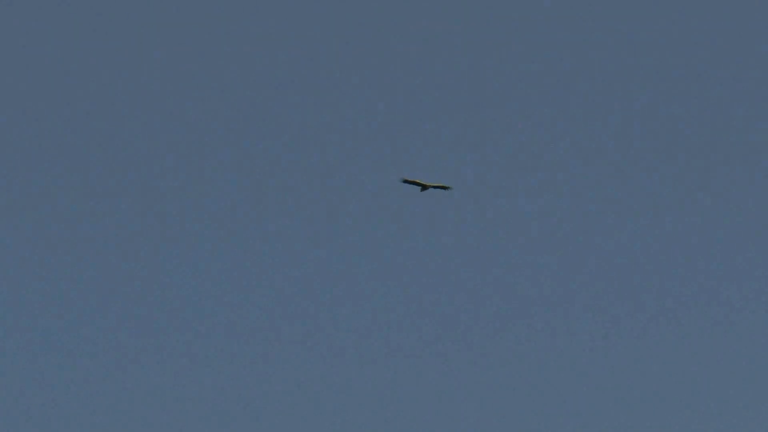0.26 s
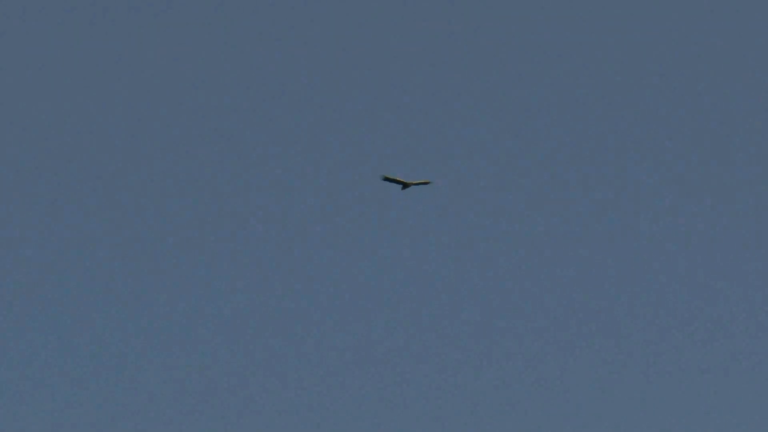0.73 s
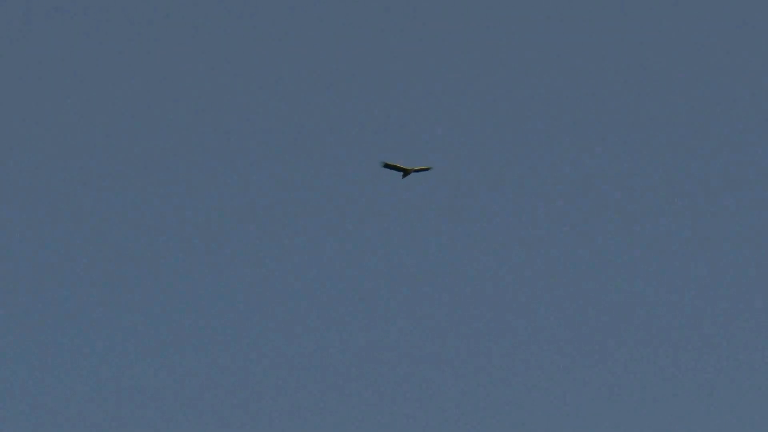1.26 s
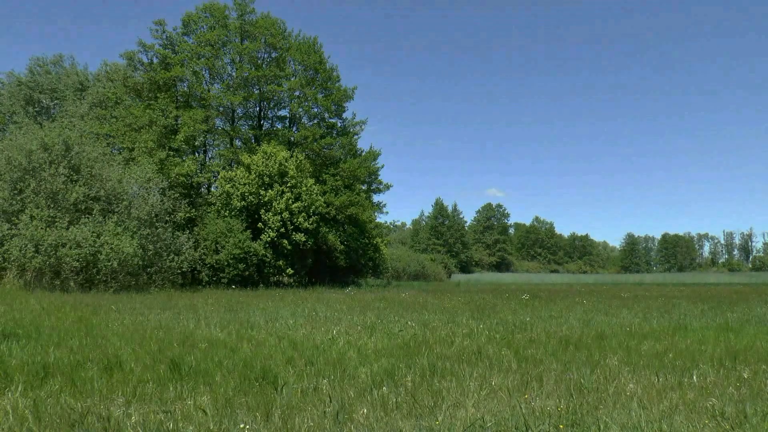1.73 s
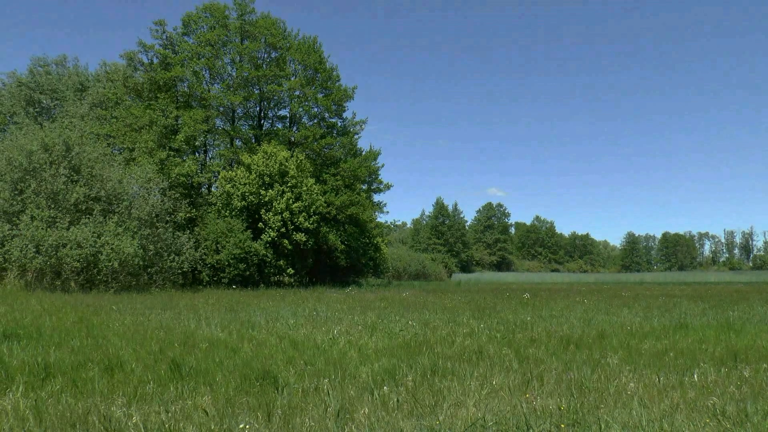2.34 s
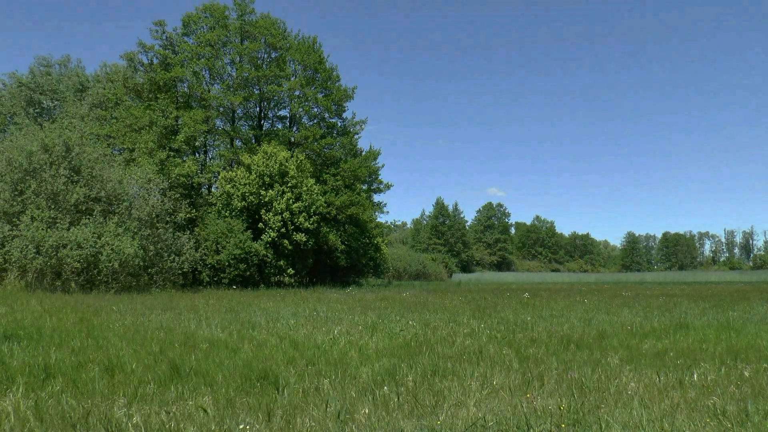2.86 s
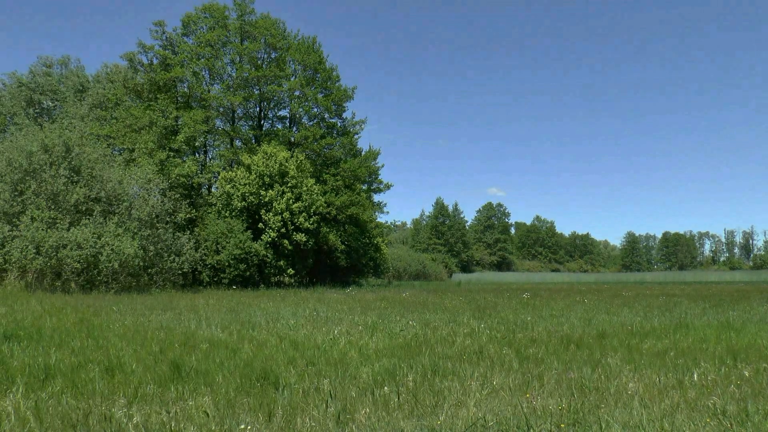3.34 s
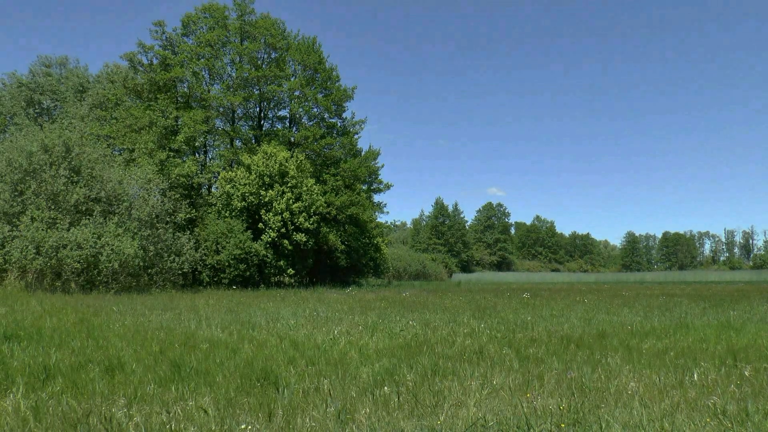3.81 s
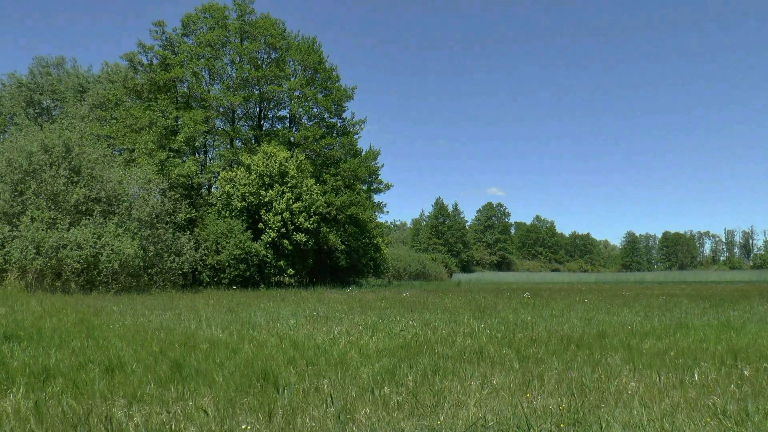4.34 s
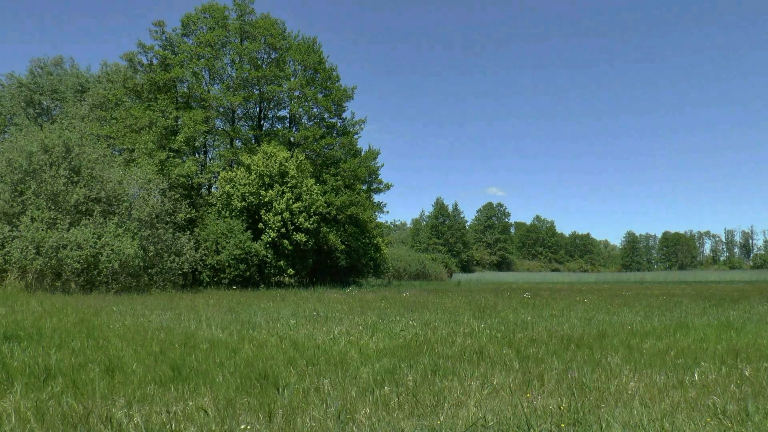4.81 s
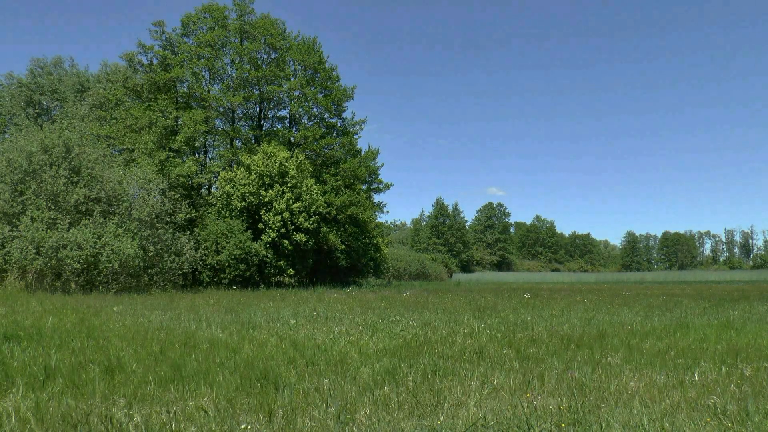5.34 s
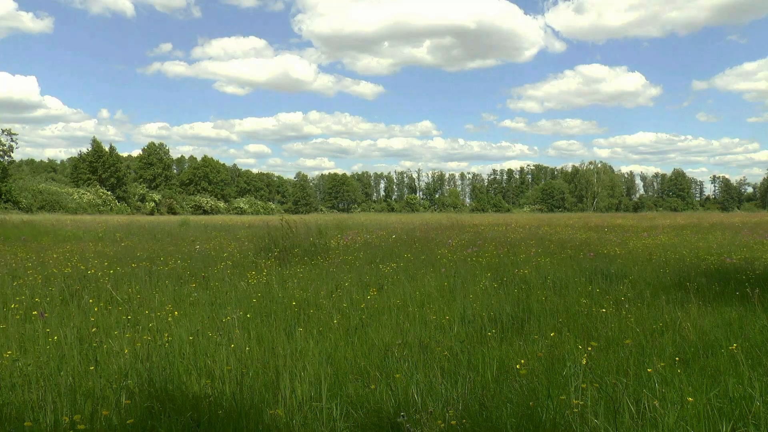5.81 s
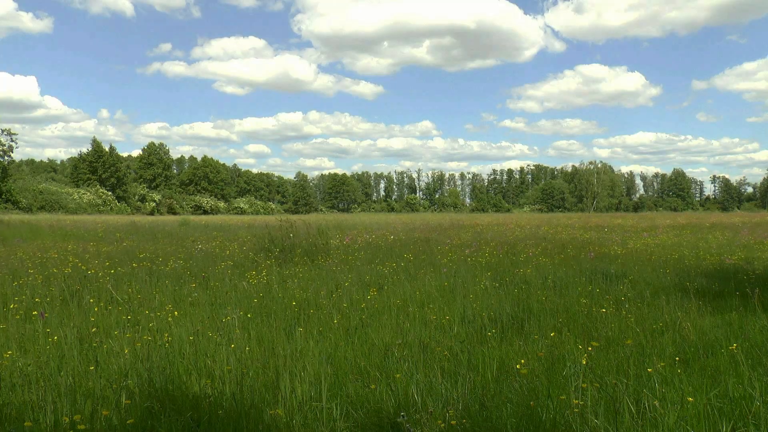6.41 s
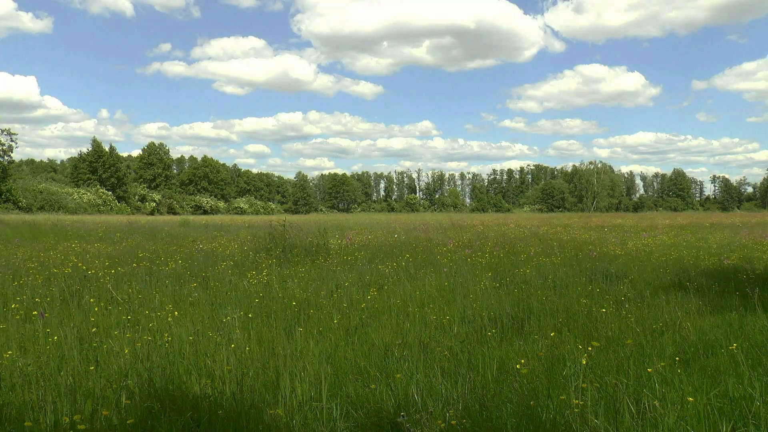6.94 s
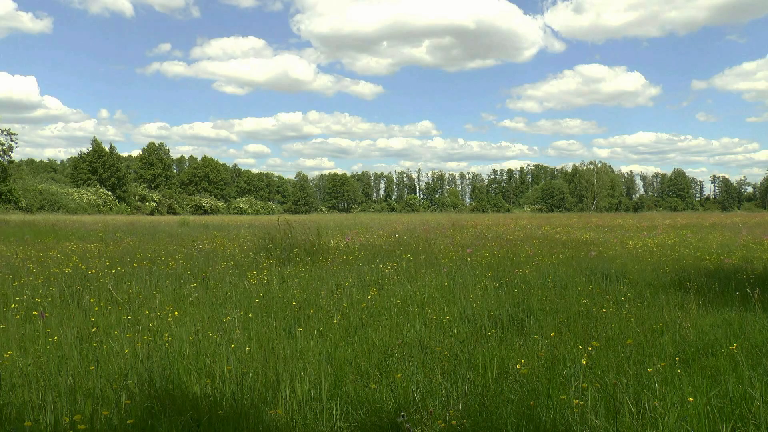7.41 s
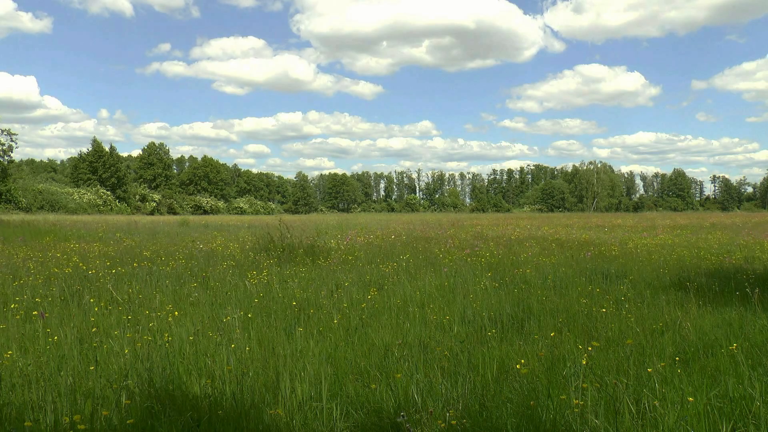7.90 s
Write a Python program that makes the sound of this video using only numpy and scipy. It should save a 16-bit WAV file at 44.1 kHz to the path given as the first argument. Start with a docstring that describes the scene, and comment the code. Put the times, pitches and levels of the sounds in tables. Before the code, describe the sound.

Open meadow near trees, heard outdoors with a short leafy tail. From 0 to 1 s a strong nightingale-like bird gives six tiny falling whistles, evenly spaced, over very quiet air; a faint warbler churr underlies the first. Between 1.1 and 2 s dry ticks and faster, stronger churrs follow, while low hum, rumble and fine grass hiss swell and spread wide. A corncrake begins weakly at 1.8 s, then rasps firmly from 2.2 s, roughly every half second to the end, each a gritty buzz under 0.2 s. Thin far whistles sound at 2.1-2.9 s. The singer gives upward hooks at 3.3 and 3.7 s; warbler ticks come at 4.1 s, a soft low purr at 4.3 s, then a growing ten-flick rattle from 4.6 to 5.25 s. A sharp warbler tick-slur lands at 5.3 s, a faint soft knock at 5.6 s. A distant arched whistle comes at 7 s, faint rising slurs at 7.4 and 7.8 s, and two dipping scoops from 8 s.

```python
"""A summer meadow edged by trees. From the start a warbler churrs faintly in runs of noise clicks, later also
ticking and slurring, while a nightingale-like singer gives falling whistles as gliding sines.
The air (coloured noise: hum, rumble, breeze, grass hiss) mostly swells and widens from 1.3 s to 2 s.
From about two seconds a corncrake rasps, pulses ringing its throat, and small birds whistle further off.
The singer goes on to hooks, a fast rattle and last scoops; the trees return a short tail."""
import sys
import numpy as np
from scipy import signal
from scipy.fft import rfft, irfft, next_fast_len
from scipy.io import wavfile
from scipy.ndimage import uniform_filter1d

SR = 44100
rng = np.random.default_rng(int(sys.argv[2]) if len(sys.argv) > 2 else 0)


def store_pcm(level_fs):
    """Save levels as 16-bit WAV."""
    pcm = np.round(np.clip(level_fs, -1, 1) * 32767).astype(np.int16)
    wavfile.write(sys.argv[1], SR, np.atleast_2d(pcm).T)


N = 359856
TIME = np.arange(N) / SR

# growth of the air: (time [s], share of the change [0-1])
AIR_RISE = [(1.3, 0.061), (1.7, 0.47), (2.05, 0.96)]
# spectra of the air layers: (frequency [Hz], relative level [dB])
HUM = [(20, -31), (45, -17.5), (70, -6.5), (120, 1), (160, -6.5), (205, -23.5), (270, -31.5), (500, -73.5)]
RUMBLE = [(15, -7.5), (30, -1), (50, 0), (80, -6.5), (130, -32), (250, -69)]
BREEZE = [(100, -10), (300, -4.5), (550, -7.5), (1100, -10.5), (1700, -13), (3000, -11.5), (6000, -23.5),
          (10000, -43.5)]
GRASS = [(1800, -37.5), (2450, -5.5), (2750, -23), (3400, -19.5), (3900, -24.5), (5050, -25.5),
         (5550, -3.5), (5950, -21), (6550, -6.5), (6900, -9), (7950, 7), (8450, -7.5), (9600, -18),
         (11000, -56), (13500, -47.5), (14500, -29.5), (15700, -9.5), (16500, -37.5)]
# levels at share 0 and share 1 of AIR_RISE; width is side over mid before each layer's offset
HUM_DB, RUMBLE_DB, GRASS_DB, WIDTH_DB = (-51, -44.5), (-71.5, -36.5), (-85.5, -46.5), (-33, 0.5)
# soft knock: (time [s], level [dB])
KNOCKS = [(5.606, -47.5)]
# knock spectrum: (frequency [Hz], relative level [dB])
KNOCK_COLOUR = [(100, -10), (280, 9), (500, -14), (1000, -25), (1700, 3), (3000, -38)]

# warbler churrs: (first click [s], last click [s], mean rate [clicks/s], slowing [0-1],
#                  first level [dB], later level [dB], treble lift [dB])
CHURRS = [(.004, .34, 67, 0, -36.5, -53, 4), (1.277, 1.424, 69, 0.13, -49, -48.5, 8),
          (1.434, 1.648, 60, .065, -31.5, -21.5, -14.5), (1.843, 2.038, 61, 0.27, -22.5, -17.5, 5)]
# churr and tick resonances: (frequency [Hz], relative level [dB])
CHURR_COLOUR = [(2500, -44), (3550, -23), (4000, 4.5), (4500, 10), (4900, 4.5), (5300, -12.5), (5600, -0.5),
                (6300, 2.5), (6750, -11), (7400, -8.5), (8450, -36), (9200, -21), (11000, -57.5),
                (13500, -53), (15000, -29), (16500, -44)]
TICK_COLOUR = [(2500, -32.5), (3500, -23.5), (4100, 8), (5000, 5.5), (6200, 6.5), (7400, -3), (8300, -13),
               (9300, -18), (11000, -64.5), (13500, -51), (15000, -20), (16500, -39.5)]
# warbler ticks: (time [s], level [dB], clicks [count])
TICKS = [(1.136, -44, 2), (1.201, -45, 2), (1.708, -26, 2), (1.778, -24, 2), (4.116, -24, 1),
         (4.157, -27.5, 1), (4.232, -18.5, 1), (5.334, -16.5, 2)]
# warbler slurs: (start [s], length [s], start pitch [Hz], end pitch [Hz], level [dB])
SLURS = [(5.341, .022, 5550, 4190, -15.5), (7.428, 0.073, 7050, 8030, -32), (7.772, 0.065, 7040, 7630, -32)]
CHURR_RISE = .07  # share by which the resonances climb through a churr
TICK_GAP_S = 0.0065

# singer's note shapes: (share of length [0-1], pitch [Hz], relative level [dB])
FALL_SHAPE = [(0, 3900, -25), (.1, 3534, -4.5), (.3, 2986, -3), (.5, 2602, -1), (.74, 2253, -3.5),
              (.88, 1974, -9.5), (1, 1806, -25)]
HOOK_SHAPE = [(0, 2075, -32), (.2, 1836, -17.5), (.4, 1771, -13), (.62, 1888, -11), (.74, 2168, -9),
              (.81, 2300, 0.5), (.9, 2321, -1.5), (1, 2261, -16)]
SCOOP_SHAPE = [(0, 3830, -26), (.22, 2697, -11.5), (.38, 2257, -4), (.55, 2276, -1), (.72, 2480, 0.5),
               (.88, 2754, -5), (1, 3050, -27)]
# falling whistles: (start [s], length [s], level [dB])
FALLS = [(0.022, 0.039, -12), (0.216, 0.039, -7.5), (0.398, 0.04, -7.5), (.591, 0.036, -6.5),
         (.776, 0.037, -6.5), (.961, 0.034, -7)]
# rising hooks: (start [s], length [s], pitch [ratio], level [dB])
HOOKS = [(3.28, .078, 0.99, -11.5), (3.709, .078, 0.99, -8)]
# rattle of downward flicks: (start [s], level [dB])
RATTLE = [(4.587, -19.5), (4.66, -18), (4.734, -13.5), (4.808, -13.5), (4.878, -11), (4.946, -11.5),
          (5.015, -10.5), (5.084, -10.5), (5.161, -11), (5.234, -11.5)]
# scoops that dip and rise: (start [s], length [s], level [dB])
SCOOPS = [(7.973, .04, -17.5), (8.089, .04, -17)]
FLICK_S, FLICK_HZ = .015, (3060, 2470, 1540)  # start, middle, end of the strongest flick
FLICK_SAG = 0.1  # share by which the weakest flick is lower
SNAP_LAG_S, SNAP_S, SNAP_HZ, SNAP_DB = 0.038, 0.019, (3560, 2656, 1750), 2  # ends each scoop; dB re scoop
# soft notes between phrases: (start [s], length [s], start pitch [Hz], end pitch [Hz], level [dB])
PIPS = [(3.377, 0.035, 1365, 1210, -34), (3.599, 0.019, 3130, 1270, -37.5),
        (3.806, .055, 1437, 1334, -34.5), (4.193, 0.096, 2410, 2140, -36.5)]
# very faint low blip about 0.1 s after each fall; dB re fall
BLIP_LAG_S, BLIP_S, BLIP_HZ, BLIP_DB = 0.1, .013, (1490, 1030), -45
# five low notes shortly before the rattle; levels of the first and last
PURR_START_S, PURR_GAP_S, PURR_NOTE_S, PURR_HZ, PURR_DB = 4.313, .027, 0.019, (1237, 1240), (-30, -30.5)

# corncrake rasps: (start [s], end [s], level [dB])
RASPS = [(1.791, 1.897, -35.5), (2.21, 2.388, -20), (2.839, 2.997, -22.5), (3.299, 3.492, -21.5),
         (3.863, 4.034, -21), (4.348, 4.53, -21.5), (4.936, 5.111, -22.5), (5.423, 5.592, -20.5),
         (6.129, 6.278, -22), (6.598, 6.779, -20.5), (7.146, 7.311, -20.5), (7.652, 7.815, -20.5)]
# effort through a rasp: (share of length [0-1], relative level [dB])
RASP_EFFORT = [(0, -18), (.07, -6.5), (.17, -4.5), (.4, -2.35), (.85, -2.1), (1, -8.5)]
# throat resonances, open beak: (frequency [Hz], relative level [dB])
THROAT = [(700, -51), (1200, -29), (1680, -33), (1950, -4.5), (2200, 2), (2530, 6), (2740, -21),
          (2880, -6.5), (3020, -16.5), (3220, 4.5), (3480, -0.5), (3660, -19.5), (4200, 4), (4680, -8.5),
          (5550, 6), (6200, 1.5), (6550, -10), (7300, -45), (10000, -84.5)]
# colour added by the shut beak: (frequency [Hz], change [dB])
SHUT_BEAK = [(2600, -1), (3200, -8.5), (3600, -12), (4200, 4.5), (5600, 0), (6400, 0.5)]
RASP_RATE_HZ, RASP_LIMP = 121, .16  # mean pulse rate; share by which gaps alternate long and short
BEAK_OPEN_SHARE = 0.46  # share of a rasp that the beak takes to open

# far whistles, before a small trim: (time [s], pitch [Hz], level [dB])
HIGH_WHISTLE = [(2.144, 5900, -43), (2.155, 7300, -24.5), (2.17, 7940, -29.5), (2.2, 7050, -23),
                (2.211, 6650, -35)]
LEVEL_WHISTLE = [(2.56, 3080, -41), (2.576, 3040, -27), (2.622, 2964, -27), (2.648, 2970, -37.5),
                 (2.846, 2945, -25.5), (2.868, 2957, -19), (2.926, 3013, -30.5), (2.93, 3000, -31)]
ARCHED_WHISTLE = [(6.86, 4440, -36), (6.878, 4585, -25), (7.02, 5050, -45), (7.042, 5080, -26.5),
                  (7.094, 4875, -21.5), (7.128, 4420, -25), (7.136, 4140, -26.5), (7.145, 4272, -35)]
# far peeps: (start [s], length [s], start pitch [Hz], end pitch [Hz], level [dB])
PEEPS = [(2.362, 0.067, 4940, 4800, -26.5), (2.607, .1, 4500, 4400, -40.5),
         (4.627, .045, 4470, 4350, -44.5)]

TOP_HZ = 15900


def undb(db):
    """Decibels to gain."""
    return 10 ** (np.asarray(db) / 20)


def unit(x):
    """Scale to rms 1."""
    return x / np.sqrt(np.mean(x ** 2) + 1e-20)


def add(track, s, sound):
    """Mix a sound into a track at a time in seconds."""
    i = max(int(s * SR), 0)
    track[i:i + len(sound)] += sound[:max(N - i, 0)]


def gains(points, size):
    """Gain per transform bin from (Hz, dB) points, interpolated over log frequency."""
    hz, db = np.transpose(points)
    bin_hz = np.arange(size // 2 + 1) * SR / size
    return undb(np.interp(np.log(bin_hz + 1), np.log(hz), db))


def resonate(x, points, size=1024):
    """Ring a sound through a minimum-phase filter of unit energy."""
    # folding the cepstrum makes the response causal
    cepstrum = irfft(np.log(gains(points, size)))
    cepstrum[1:size // 2] *= 2
    cepstrum[size // 2 + 1:] = 0
    ring = irfft(np.exp(rfft(cepstrum)))
    return signal.oaconvolve(x, ring / np.linalg.norm(ring))[:N]


def walk(rate_hz):
    """Random drift of rms near 1: held noise smoothed twice."""
    k = int(SR / rate_hz)
    steps = np.repeat(rng.standard_normal(N // k + 1), k)
    smooth = uniform_filter1d(uniform_filter1d(steps, k), k)
    return unit(smooth[:N])


def wash(points, side_db):
    """Coloured stereo noise of rms near 1; side_db is side over mid."""
    size = next_fast_len(N)
    spectrum = rfft(rng.standard_normal((2, size))) * gains(points, size)
    mid, side = unit(irfft(spectrum, size)[:, :N])
    side_gain = undb(side_db)
    return (mid + side_gain * side * np.array([[1], [-1]])) / np.hypot(1, side_gain)


def background():
    """Distant hum, low wind rumble, soft breeze, shimmering grass hiss and one soft knock, as coloured noise."""
    rise = np.interp(TIME, *np.transpose(AIR_RISE))
    hum_db, rumble_db, grass_db, width_db = (
        before + rise * (after - before) for before, after in (HUM_DB, RUMBLE_DB, GRASS_DB, WIDTH_DB))
    hum = wash(HUM, side_db=width_db - 4.5) * undb(hum_db)
    rumble = wash(RUMBLE, side_db=width_db + 5.0) * undb(rumble_db)
    grass = wash(GRASS, side_db=width_db) * undb(grass_db + 2.7 * walk(14))
    breeze = wash(BREEZE, side_db=width_db - 8.5) * undb(-61.0)
    knock = snaps(KNOCKS, KNOCK_COLOUR, length_s=0.02)
    return hum + rumble + grass + breeze + knock


def churrs(click_s):
    """Runs of noise clicks that keep pace or slow; resonances climb while the level swells or fades."""
    out, window = np.zeros(N), np.hanning(int(click_s * SR))
    hz, db = np.transpose(CHURR_COLOUR)
    for start, end, rate_hz, slowing, first_db, later_db, lift_db in CHURRS:
        colour_db = db + lift_db * np.interp(hz, [4800, 7500], [0, 1])
        for u in np.linspace(0, 1, round((end - start) * rate_hz) + 1):
            s = start + (end - start) * u * (1 - slowing * (1 - u))
            level_db = np.interp(u, [0, .5], [first_db, later_db])
            click = window * rng.standard_normal(len(window)) * undb(level_db)
            climbed_hz = hz * (1 + CHURR_RISE * (u - .5))
            add(out, s - click_s / 2, resonate(click, np.c_[climbed_hz, colour_db]))
    return out


def snaps(events, colour, length_s):
    """Dry clicks: short Hann-gated noise rung through a resonance."""
    gate = np.zeros(N)
    for s, db in events:
        add(gate, s - length_s / 2, undb(db) * np.hanning(int(length_s * SR)))
    return resonate(gate * rng.standard_normal(N), colour)


def warbler():
    """Churrs and ticks are gated noise; slurs are wavering sines."""
    clicks = [(s + k * TICK_GAP_S, db) for s, db, count in TICKS for k in range(round(count))]
    slurs = [arc(s, length, (first, last), db) for s, length, first, last, db in SLURS]
    ticks = snaps(clicks, TICK_COLOUR, length_s=0.011)
    slurred = whistle(slurs, waver=.025, overtone_db=-53, flutter_db=4.0)
    return ticks + slurred + churrs(click_s=0.0076)


def arc(s, length_s, pitches_hz, db, crest=.5, taper=1.6):
    """A note that swells and dies while its pitch runs through two or three values: (start, Hz, gain)."""
    u = np.linspace(0, 1, int(length_s * SR))
    knots = np.linspace(0, 1, len(pitches_hz))
    hz = np.polyval(np.polyfit(knots, pitches_hz, len(pitches_hz) - 1), u)
    ramp = np.interp(u, [0, np.clip(crest, .1, .9), 1], [0, 1, 0])
    swell = np.sin(np.pi / 2 * ramp) ** taper
    return s, hz, undb(db) * swell


def glide(curve, db=0, edge_s=.002):
    """A note through (s, Hz, dB) points, with soft ends: (start, Hz, gain)."""
    s, hz, levels_db = np.transpose(curve)
    t = np.arange(s[0], s[-1], 1 / SR)
    edges = np.clip(np.minimum(t - s[0], s[-1] - t) / edge_s, 0, 1)
    return s[0], np.interp(t, s, hz), edges * undb(np.interp(t, s, levels_db) + db)


def shaped(shape, s, length_s, db, pitch=1):
    """A note shape at a given time, length, level and pitch ratio."""
    return glide(np.array(shape) * [length_s, pitch, 1] + [s, 0, 0], db)


def whistle(notes, waver, overtone_db, flutter_db):
    """Sines with an octave overtone; pitch wavers and loudness flutters by random drift."""
    out = np.zeros(N)
    drift = 1 + waver * walk(160)
    flutter = undb(flutter_db * walk(240))
    for s, hz, swell in notes:
        note_drift = np.resize(drift[max(int(s * SR), 0):][:len(hz)], len(hz))
        phase = 2 * np.pi * np.cumsum(hz * note_drift) / SR
        tone = np.sin(phase) + undb(overtone_db) * np.sin(2 * phase)
        add(out, s, np.sqrt(2) * swell * tone)
    return out * flutter


def beak(x, hz, width_hz, leak):
    """A broad resonance beside a direct leak: a sweep flares as it passes through."""
    resonance = signal.lfilter(*signal.iirpeak(hz, hz / width_hz, fs=SR), x)
    return leak * x + (1 - leak) * resonance


def loud_song():
    """Gliding sines: falls, hooks and scoops each repeat a shape; rattle pitch rises with strength."""
    notes = [shaped(FALL_SHAPE, s, length, db) for s, length, db in FALLS]
    notes += [shaped(HOOK_SHAPE, s, length, db, pitch) for s, length, pitch, db in HOOKS]
    levels_db = [db for s, db in RATTLE]
    for s, db in RATTLE:
        pitch = np.interp(db, [min(levels_db), max(levels_db)], [1 - FLICK_SAG, 1])
        notes.append(arc(s, FLICK_S, pitch * np.array(FLICK_HZ), db, crest=0.57, taper=2.17))
    for s, length, db in SCOOPS:
        notes.append(shaped(SCOOP_SHAPE, s, length, db))
        notes.append(arc(s + SNAP_LAG_S, SNAP_S, SNAP_HZ, db + SNAP_DB, taper=2.3))
    return whistle(notes, waver=0.0062, overtone_db=-45.5, flutter_db=1.36)


def soft_sounds():
    """Quiet sines: a barely audible low blip after each fall, pips between phrases and a five-note purr."""
    notes = [arc(s + BLIP_LAG_S, BLIP_S, BLIP_HZ, db + BLIP_DB) for s, length, db in FALLS]
    notes += [arc(s, length, (first, last), db, crest=.42, taper=1.8)
              for s, length, first, last, db in PIPS]
    for k, db in enumerate(np.linspace(*PURR_DB, 5)):
        notes.append(arc(PURR_START_S + k * PURR_GAP_S, PURR_NOTE_S, PURR_HZ, db))
    return whistle(notes, waver=.0046, overtone_db=-45.5, flutter_db=0.0)


def corncrake(flutter_hz, pulse_s, hiss, stretch, uneven_db):
    """Pulses at alternating long and short gaps; in each the membrane slaps a few times and rings the throat."""
    out = np.zeros(N)
    u = np.linspace(0, 1, int(pulse_s * SR))
    hz, throat_db = np.transpose(THROAT)
    shut_db = np.interp(hz, *np.transpose(SHUT_BEAK))
    for start, end, db in RASPS:
        s, swing = start, 1
        colour_db = throat_db + uneven_db * rng.standard_normal(len(hz))  # no two rasps quite alike
        while s <= end:
            gap, pitch, size_db, offset = rng.standard_normal(4)
            gas = rng.standard_normal(len(u))
            progress = (s - start) / (end - start)
            # slaps slow as the pressure of each pulse drops
            slap_hz = flutter_hz * (1 + .08 * pitch) * (1 + 0.33 * (.5 - u))
            cycles = np.floor(np.cumsum(slap_hz) / SR + offset)
            slaps = np.diff(cycles, prepend=cycles[0])
            burst = np.sin(np.pi * u) * (unit(slaps) + hiss * gas)
            # the opening beak recolours the throat; the resonances climb throughout
            shut = max(1 - progress / BEAK_OPEN_SHARE, 0)
            climbed_hz = hz * (1 + stretch * (progress - .5))
            pulse = resonate(burst, np.c_[climbed_hz, colour_db + shut * shut_db])
            effort_db = np.interp(progress, *np.transpose(RASP_EFFORT)) + size_db
            # one pulse per mean period gives rms 1 before the level
            pulse *= np.sqrt(SR / RASP_RATE_HZ) / np.linalg.norm(pulse)
            add(out, s - pulse_s / 2, pulse * undb(db + effort_db))
            s += (1 + swing * RASP_LIMP + .04 * gap) / RASP_RATE_HZ
            swing = -swing
    return out


def far_birds():
    """Three drawn-out whistles and a few thin peeps, all gliding sines."""
    notes = [glide(HIGH_WHISTLE, db=2.0),
             glide(LEVEL_WHISTLE, db=-0.3, edge_s=.008),
             glide(ARCHED_WHISTLE, db=1.7, edge_s=.008)]
    notes += [arc(s, length, (first, last), db, crest=.25, taper=0.58)
              for s, length, first, last, db in PEEPS]
    return whistle(notes, waver=0.004, overtone_db=-54.5, flutter_db=0.4)


def trees(x, early_db, early_t60, late_db, late_t60, side_db):
    """Direct sound, quick scatter from near foliage and a longer tail from the forest edge; t60 in s."""
    t = TIME[:SR]
    tail = 0
    for db, t60_s in ((early_db, early_t60), (late_db, late_t60)):
        fade = undb(-60 * t / t60_s) * (1 - np.exp(-t / .006))
        tail = tail + undb(db) * fade / np.linalg.norm(fade) * rng.standard_normal((2, SR))
    mid, side = signal.fftconvolve(x[None], tail, axes=1)[:, :N]
    side = np.diff(side, prepend=0)  # left and right differ more in the treble
    return x + mid + undb(side_db) * side * np.array([[1], [-1]])


def scene():
    """The air, and each source with its own return from the trees."""
    singer = beak(loud_song(), hz=2570, width_hz=1200, leak=0.24) * undb(1.0)
    crake = corncrake(flutter_hz=1137.4, pulse_s=.0034, hiss=0.25, stretch=0.039, uneven_db=0.9)
    return (background()
            + trees(warbler(), early_db=-4.5, early_t60=.18, late_db=-7.0, late_t60=0.48, side_db=-32.0)
            + trees(singer, early_db=-6.5, early_t60=0.24, late_db=-14, late_t60=1.0, side_db=-44.5)
            + trees(soft_sounds(), early_db=-10, early_t60=0.28, late_db=-15.0, late_t60=0.63, side_db=-23)
            + trees(crake, early_db=-4.0, early_t60=0.078, late_db=-8, late_t60=0.53, side_db=1.5)
            + trees(far_birds(), early_db=-10.0, early_t60=0.33, late_db=-7, late_t60=0.59, side_db=-31.5))


def record(dry):
    """Steep elliptic low-pass: cuts the very top."""
    return signal.sosfilt(signal.ellip(8, .2, 70, TOP_HZ, fs=SR, output="sos"), dry)


dry = scene()
out = record(dry)
store_pcm(out)
```